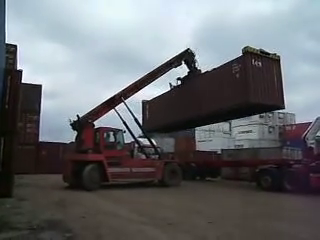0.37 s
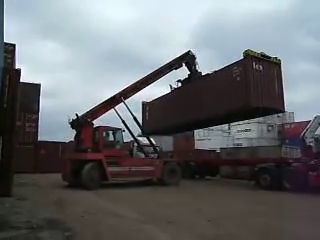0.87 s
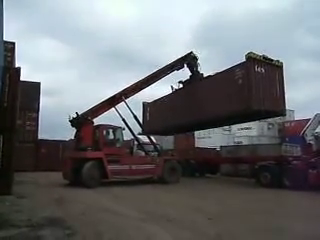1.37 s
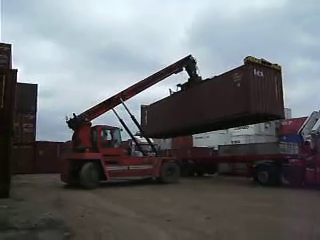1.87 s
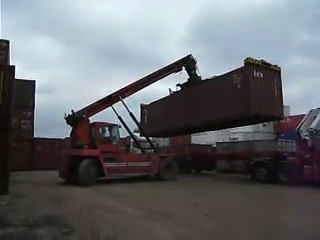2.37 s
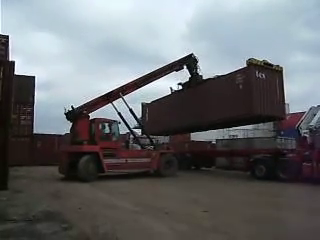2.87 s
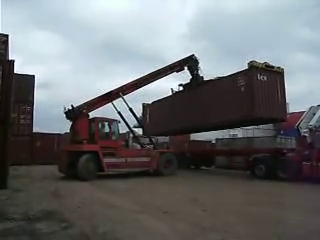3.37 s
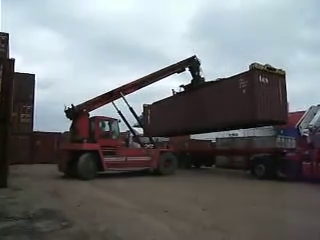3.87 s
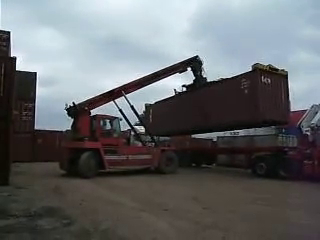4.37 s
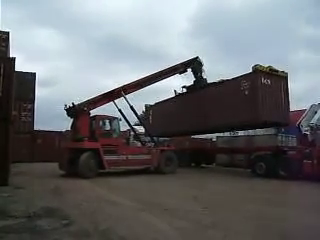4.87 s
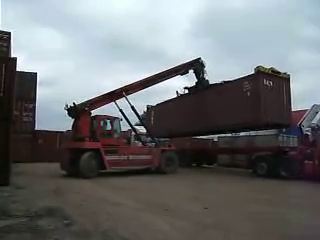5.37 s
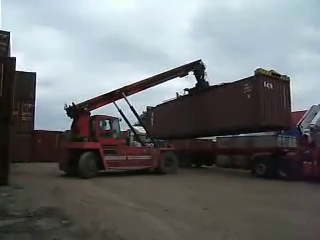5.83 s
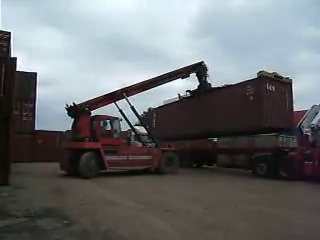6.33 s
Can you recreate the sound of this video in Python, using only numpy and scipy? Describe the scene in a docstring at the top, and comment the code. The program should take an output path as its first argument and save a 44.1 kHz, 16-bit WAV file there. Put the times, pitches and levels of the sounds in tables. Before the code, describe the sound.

In an open container yard, a big diesel handler roars steadily under load. A brief steel scrape opens, then a hard knock lands early on. The engine note drops in steps, a hydraulic whine joins, and small metallic ticks follow. A click jumps the sound near the end. Dull, distorted small camera microphone.

```python
"""A six-cylinder diesel container handler works under load in an open yard, slowing in steps as it lowers a box.
Exhaust tones, fan, gears and pumps are sines locked to the crank; roar, clatter and panels are noise driven
by the firings. Steel scrapes and knocks; a second motor hums, with wavering tones and a fading turbo whistle.
A small camera overloads, keeps only the band under 5.5 kHz and clicks once as the crank tones leap ahead."""
import sys
import numpy as np
from scipy import signal
from scipy.fft import rfft, irfft, next_fast_len
from scipy.io import wavfile
from scipy.ndimage import uniform_filter1d

SR = 44100
rng = np.random.default_rng(int(sys.argv[2]) if len(sys.argv) > 2 else 0)


def level_to_linear(level):
    """Convert decibel levels to linear amplitude factors, elementwise."""
    exponent = np.asarray(level, float) / 20
    return 10 ** exponent


def to_wav(s):
    """Save 16-bit WAV."""
    ch = np.atleast_2d(s).T  # columns
    pcm = np.round(np.clip(ch, -1, 1) * 32767)  # PCM
    wavfile.write(sys.argv[1], SR, pcm.astype(np.int16))


N = 296352
TIME = np.arange(N) / SR
SKIP_S, SKIP_SAMPLES = 6.2208, 1024  # the crank leaps ahead by a dropped block
FIRINGS_PER_CYCLE = 6  # a cycle is two crank turns


def curves(rows):
    """Every column after t/s, interpolated over TIME."""
    s, *columns = np.transpose(rows)
    return [np.interp(TIME, s, column) for column in columns]


def evened(x):
    """Scales to rms 1."""
    return x / np.sqrt(np.mean(x ** 2) + 1e-20)


def drift(per_s):
    """Slow random curve of rms 1 that changes about per_s times a second."""
    points = rng.standard_normal(int(N / SR * 60) + 2)  # 60 a second
    span = max(int(30 / per_s), 1)
    points = evened(uniform_filter1d(uniform_filter1d(points, span), span))
    return np.interp(TIME * 60, np.arange(len(points)), points)


def bump(middle_s, half_s):
    """Gaussian bell from 0 to 1 and back; down to 1/e at half_s from the middle."""
    return np.exp(-((TIME - middle_s) / half_s) ** 2)


def tone(turns, rms_db):
    """Sine from its phase in turns and its rms level."""
    return np.sqrt(2) * level_to_linear(rms_db) * np.cos(2 * np.pi * turns)


def coloured(x, spectrum):
    """Zero-phase filter to a spectrum of (f/Hz, level/dB), then rms 1."""
    hz, db = np.transpose(spectrum)
    size = next_fast_len(N)
    bins_hz = np.fft.rfftfreq(size, 1 / SR)
    gain = level_to_linear(np.interp(np.log(bins_hz + 1), np.log(hz + 1), db))
    return evened(irfft(rfft(x, size) * gain, size)[:N])


def ring(x, hz, width_hz):
    """Two-pole resonance; a narrower width rings longer."""
    r = np.exp(-np.pi * width_hz / SR)
    return signal.lfilter([1], [1, -2 * r * np.cos(2 * np.pi * hz / SR), r * r], x)


# second motor: t/s, f/Hz, rms level/dB
HUM_TRACK = [(0, 61.7, -36.5), (.6, 60.6, -27.5), (.9, 57.96, -26.5), (1.2, 56.16, -18.5),
             (2.1, 54.8, -23.5), (2.5, 56.07, -19), (3.4, 57.5, -22), (4.2, 58.65, -29), (4.6, 58.25, -37),
             (6.72, 58.09, -40.5)]


def second_motor():
    """Hum of a nearby motor that wanders in speed and level."""
    hum_hz, hum_db = curves(HUM_TRACK)
    return tone(np.cumsum(hum_hz) / SR, hum_db)


# narrow noise bands: f/Hz, width/Hz, rms level/dB
WAVERING_BANDS = [(132.2, 1.5, -33), (735, 8, -38), (938, 6, -37), (1100, 30, -39), (1223, 5, -35.5)]


def wavering_tones():
    """Noise through narrow resonances: tones that waver in level and phase."""
    out = np.zeros(N)
    for hz, width_hz, db in WAVERING_BANDS:
        out += level_to_linear(db) * evened(ring(rng.standard_normal(N), hz, width_hz))
    return out


def turbo_whistle():
    """Sagging, jittery sine that fades steadily after 2 s."""
    hz = 3055 - 10 * TIME + 6 * drift(12)
    fade_start_s, fade_db_per_s = 2, 49
    db = -42 - fade_db_per_s * np.maximum(TIME - fade_start_s, 0) + 2.3 * drift(8)
    return tone(np.cumsum(hz) / SR, db)


# scraped spreader resonances: f/Hz, width/Hz, relative level/dB
SPREADER_RINGS = [(2280, 130, -3), (2700, 130, -1), (2980, 130, 0)]


def scrape():
    """Steel drags on steel: sparse random slips ring the spreader for a moment."""
    slips_per_s, level_db = 1500, -22.5
    slips = rng.standard_normal(N) * (rng.random(N) < slips_per_s / SR)
    rings = sum(level_to_linear(db) * evened(ring(slips, hz, width_hz)) for hz, width_hz, db in SPREADER_RINGS)
    return level_to_linear(level_db) * bump(.07, .045) * evened(rings)


# steel impacts: t/s, level/dB of the first mode before decay, f/Hz, t60/s
STEEL_KNOCKS = [(1.4742, -1, 1320, .024), (3.17, -25, 2690, .08), (3.96, -24, 2690, .08),
                (5.54, -24, 2690, .08), (5.65, -22, 2690, .08), (6.13, -21, 2690, .08)]
# modes of each impact: multiple of its f, relative level/dB
STEEL_MODES = [(1, 0), (1.25, -9)]


def knocks():
    """Steel knocks from boom and spreader: decaying sine modes with a 0.4 ms attack."""
    out, t = np.zeros(N), TIME[:4000]
    for s, db, hz, t60_s in STEEL_KNOCKS:
        at = round(s * SR)
        modes = sum(level_to_linear(mode_db) * np.sin(2 * np.pi * k * hz * t) for k, mode_db in STEEL_MODES)
        attack = np.minimum(t / .0004, 1)
        out[at:at + len(t)] += level_to_linear(db - 60 * t / t60_s) * modes * attack
    return out


# engine course: t/s, crank speed/rpm, exhaust boom level/dB, combustion load/dB
ENGINE_COURSE = [(0, 1294, -12.5, 2.5), (.15, 1313, -9, 1.5), (.45, 1325, -8, 0), (.75, 1325, -10.5, 0.5),
                 (1.05, 1328, -11, -0.5), (1.37, 1315, -8.5, 0.5), (1.87, 1312, -8.5, 0),
                 (2.05, 1278, -10.5, 1), (2.5, 1278, -7.5, 2), (2.79, 1276, -9, -0.5),
                 (2.93, 1226, -10, -0.5), (3.08, 1235, -9, -0.5), (3.2, 1235, -11.5, -0.5),
                 (3.35, 1227, -9.5, -1.5), (3.58, 1226, -11.5, -0.5), (3.8, 1226, -9, -0.5),
                 (4.9, 1221, -8.5, -1), (5.3, 1221, -9, -1), (5.5, 1211, -9.5, 0.5), (6.72, 1211, -9, 0)]


def engine_course():
    """Crank rpm, boom dB and load dB over time."""
    return curves(ENGINE_COURSE)


def crank():
    """Engine cycles done so far: integrated speed, with the leap at SKIP_S."""
    rpm = engine_course()[0]
    per_sample = rpm / 120 / SR  # two turns a cycle
    per_sample[round(SKIP_S * SR)] *= SKIP_SAMPLES
    start_cycles = .37
    return start_cycles + np.cumsum(per_sample)


def slowed(from_rpm, span_rpm):
    """0 while the engine runs above from_rpm, 1 once span_rpm below it."""
    return np.clip((from_rpm - engine_course()[0]) / span_rpm, 0, 1)


def fuel_cut():
    """Stumble as the driver lifts off, 0 to 1 and back."""
    return bump(2.925, .027)


# pipe and casing favour each tone at its own speed:
# crank speed/rpm, then level/dB of firing tone, half tone, fan, gear pump, gear mesh
TONES_BY_RPM = [(1211, -15.5, -22.5, -27.5, -26.5, -28.5), (1223.6, -15.5, -24, -29.5, -22, -34),
                (1277, -13, -15.5, -32.5, -19, -37), (1311, -16, -17, -26, -19.5, -42),
                (1327, -19, -19, -24, -25, -31)]


def tone_levels():
    """Level of the five tones at the speed of the moment, dB."""
    rpm, *columns = np.transpose(TONES_BY_RPM)
    now_rpm = engine_course()[0]
    return [np.interp(now_rpm, rpm, column) for column in columns]


def valve(opens_s, closes_s, open_db):
    """Tone level in dB as the lift valve works: quick rise, hold, steady fall to a floor."""
    shut_db, rise_s, fall_db_per_s = -47, .18, 23
    rise = np.clip((TIME - opens_s) / rise_s, 0, 1)
    fall_db = fall_db_per_s * np.maximum(TIME - closes_s, 0)
    return np.maximum(shut_db + rise * (open_db - shut_db) - fall_db, shut_db)


def fan(cycle):
    """Blade-pass tone and its octave, geared to the crank."""
    blades_per_cycle = 16.17
    db = tone_levels()[2] + 1.4 * drift(.84)
    return tone(blades_per_cycle * cycle, db) + tone(2 * blades_per_cycle * cycle, db - 16.5)


# gear pump overtones: multiple of the first, level/dB relative to it
PUMP_OVERTONES = [(2, -12), (3, -14), (4, -16)]


def gear_pump(cycle):
    """Pressure pulses of the gear pump as a harmonic series."""
    pulses_per_cycle = 17.63
    pump_db = tone_levels()[3]
    out = tone(pulses_per_cycle * cycle, pump_db)
    for k, db in PUMP_OVERTONES:
        out += tone(k * pulses_per_cycle * cycle + rng.random(), pump_db + db + .64 * drift(3.4))
    return out


def gear_mesh(cycle):
    """92 teeth meet per cycle; backlash blurs the phase."""
    return tone(92 * cycle + .037 * drift(15), tone_levels()[4] + 1.1 * drift(6))


def lift_pump(cycle):
    """Two pump tones, loud while the lift valve is open."""
    low = tone(58.78 * cycle, valve(2.9, 5.9, -31) + .93 * drift(5))
    high = tone(88.17 * cycle, valve(3.25, 5.85, -28.5) + 2.1 * drift(6))
    return low + high


# knock strength in firing order: relative level/dB
CYLINDER_LEVELS = [-10, -7, -8.5, -3.5, -5.5, -3]


def firings(cycle, spread_db, t60_s):
    """Pressure envelope: a decaying puff per firing, uneven by cylinder and by chance."""
    count = np.floor(FIRINGS_PER_CYCLE * cycle + .3).astype(int)
    chance_db = spread_db * rng.standard_normal(count[-1] + 1)
    size = level_to_linear(np.array(CYLINDER_LEVELS)[count % FIRINGS_PER_CYCLE] + chance_db[count])
    fires = np.diff(count, prepend=count[0]) == 1
    return signal.lfilter([1], [1, -level_to_linear(-60 / t60_s / SR)], size * fires)


# low block noise spectrum: f/Hz, relative level/dB per Hz
ROAR_SPECTRUM = [(15, -44.5), (30, -19.5), (50, -9.5), (80, -17.5), (125, -14), (170, -5.5), (285, -13),
                 (380, -13.5), (470, -22.5), (600, -16), (760, -18), (930, -19), (1330, -29.5),
                 (1800, -37.5), (2340, -68), (3960, -120)]
# bright block noise spectrum: f/Hz, relative level/dB per Hz
CLATTER_SPECTRUM = [(590, -33.5), (1000, -8), (1490, -9), (2060, -8.5), (2270, -9.5), (2480, -8.5),
                    (3240, -11.5), (3610, -9), (3930, -16), (4740, -14.5), (5600, -16.5), (7280, -60.5),
                    (12300, -120)]
# panel resonances: f/Hz, width/Hz, relative level/dB running fast, same running slow
PANEL_RINGS = [(2230, 80, 0, -11), (2352, 45, -8, 1.5), (2695, 45, -9, -1.5), (2950, 50, -9, -5),
               (3650, 200, -4, -9), (4550, 70, -14, -16)]


def block(cycle):
    """Firings push noise into roar, clatter and ringing panels; part of each blow repeats every cycle."""
    load_db = engine_course()[2] - 4 * fuel_cut()
    puff = firings(cycle, spread_db=3.0, t60_s=.046)
    surface = rng.standard_normal(1200)  # the same knocks at the same crank angles
    repeat = evened(np.interp(cycle % 1, np.linspace(0, 1, len(surface)), surface))
    air, hiss, rattle = rng.standard_normal((3, N))

    roar = coloured((1.8 + puff) * air + 1.1 * repeat, ROAR_SPECTRUM)
    roar *= level_to_linear(-16 + .8 * drift(5.9))
    clatter = coloured((1.0 + puff) * hiss + .31 * repeat, CLATTER_SPECTRUM)
    clatter *= level_to_linear(-27 + load_db + .22 * drift(8))

    shake = (.6 + puff) * rattle
    slow = slowed(1315, 45)
    panels = np.zeros(N)
    for hz, width_hz, fast_db, slow_db in PANEL_RINGS:
        db = fast_db + slow * (slow_db - fast_db) + 1.3 * drift(7)
        panels += level_to_linear(db) * evened(ring(shake, hz, width_hz))
    panels_db = -33 + .95 * TIME + load_db  # they ring harder as the box comes down
    return roar + clatter + evened(panels) * level_to_linear(panels_db)


# weaker exhaust tones: multiple of the cycle, rms level/dB running fast, same running slow
EXHAUST_ORDERS = [(13, -33, -31), (14, -37, -36), (15, -27, -31), (18, -28, -35), (20, -36, -31),
                  (21, -35, -40), (22, -39, -36), (24, -32, -30), (25, -49, -34), (27, -41, -38),
                  (30, -35, -35), (33, -38, -37), (34, -34, -43), (36, -38, -38), (37, -46, -36),
                  (60, -39, -35), (66, -39, -48), (72, -42, -38), (78, -48, -40), (90, -46, -39),
                  (93, -46, -39), (120, -47, -39)]


def exhaust(cycle):
    """Crank-locked sines: boom, firing and half tone in fixed phase, plus weaker orders."""
    cut_db = -11 * fuel_cut()
    boom_db = engine_course()[1] + cut_db
    firing_db, half_db = [db + cut_db for db in tone_levels()[:2]]
    lag = 1 / (2 * np.pi)  # turns: the two lower tones trail the boom by a radian
    out = tone(12 * cycle, boom_db + .4 * drift(8))
    out += tone(FIRINGS_PER_CYCLE * cycle - lag, firing_db + 1.1 * drift(5))
    out += tone(9 * cycle - lag, half_db + 1.6 * drift(5))
    slow = slowed(1290, 60)  # pipe resonances favour other orders as the speed drops
    for k, fast_db, slow_db in EXHAUST_ORDERS:
        db = fast_db + slow * (slow_db - fast_db) + 2.38 * drift(4)
        out += tone(k * cycle + rng.random(), db)
    return out


def scene():
    """All sources at one microphone."""
    cycle = crank()
    background = second_motor() + wavering_tones() + turbo_whistle()
    steel = scrape() + knocks()
    driven = fan(cycle) + gear_pump(cycle) + gear_mesh(cycle) + lift_pump(cycle)
    return (background + steel + driven + block(cycle) + exhaust(cycle))[None]


def band_limit(x):
    """A steep low-pass at the top of the band."""
    return signal.sosfilt(signal.butter(12, 15870, fs=SR, output="sos"), x)


def record(dry):
    """Camera: offset and clipping at SR/4, resampling to SR, a click at SKIP_S, a second clip."""
    coarse = np.clip(signal.resample_poly(dry, 1, 4, axis=1) - .018, -.70, .70)
    stuffed = np.zeros_like(dry)
    stuffed[:, ::4] = 4 * coarse
    smooth = signal.firwin(95, 5400, window=("kaiser", 7.5), fs=SR)
    out = signal.oaconvolve(stuffed, smooth[None], "same")
    after_s = TIME - SKIP_S
    decay = (after_s >= 0) * np.exp(-np.maximum(after_s, 0) / .002)
    out -= np.copysign(.6, out[0, round(SKIP_S * SR)]) * decay  # step against the wave's sign
    return band_limit(np.clip(out, -.71, .71))


dry = scene()
out = record(dry)
to_wav(out)
```